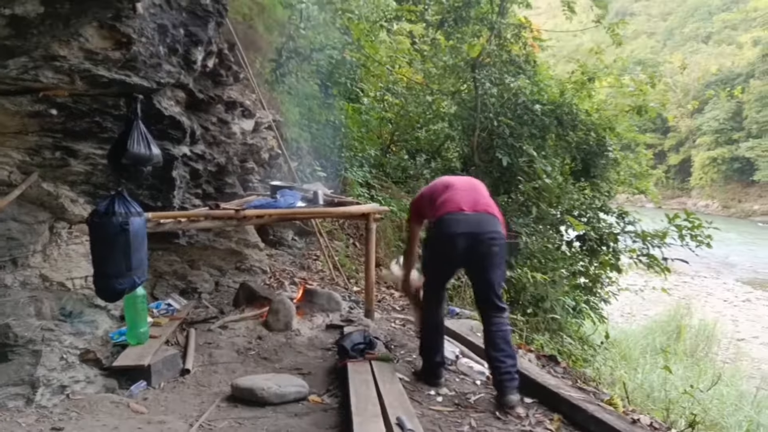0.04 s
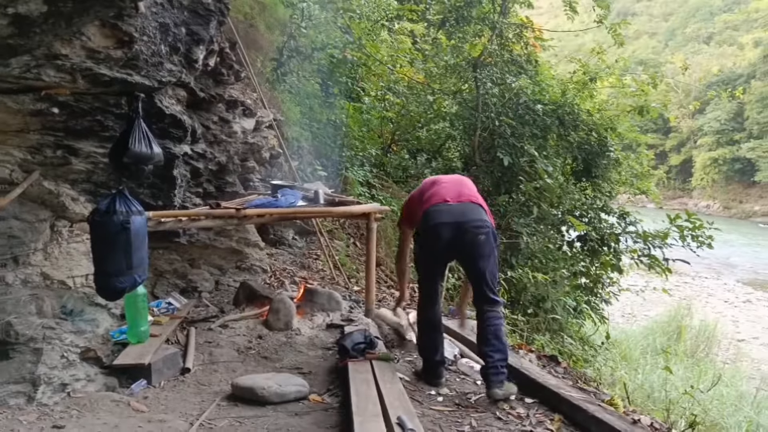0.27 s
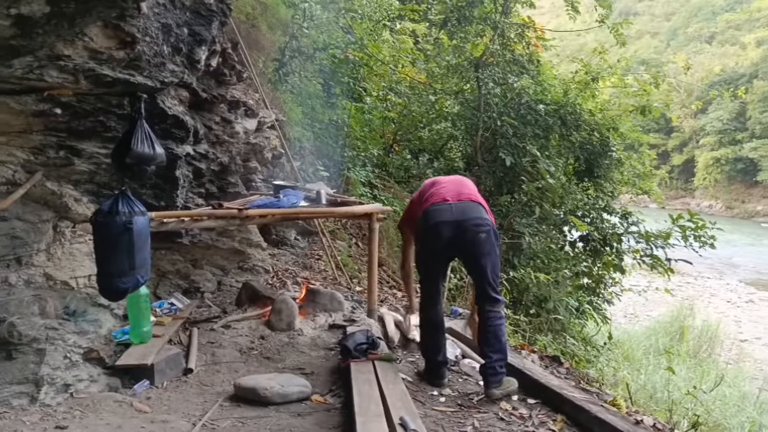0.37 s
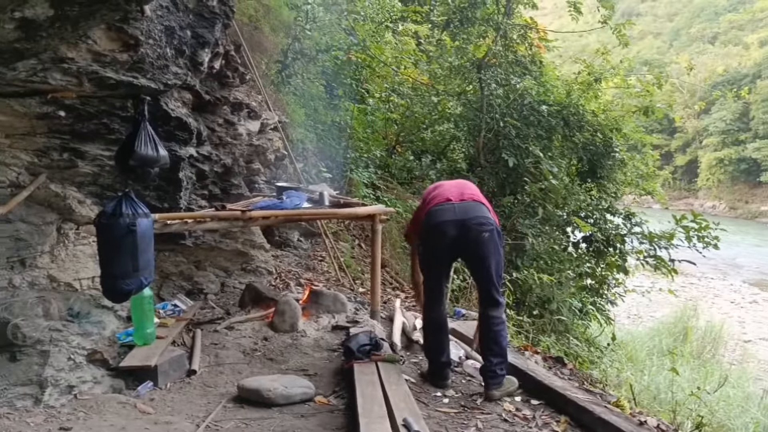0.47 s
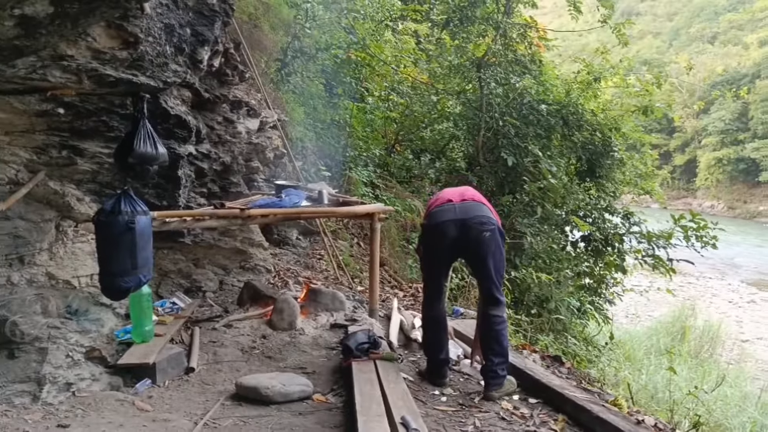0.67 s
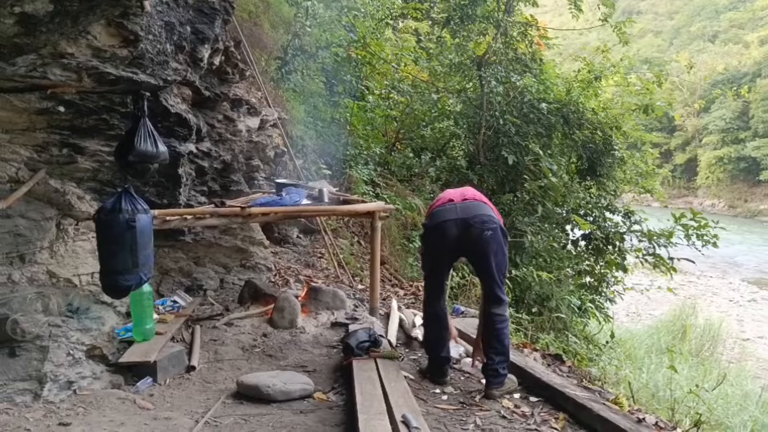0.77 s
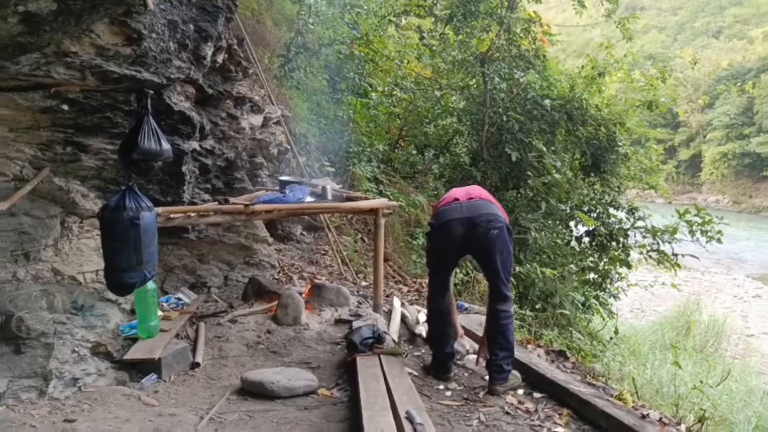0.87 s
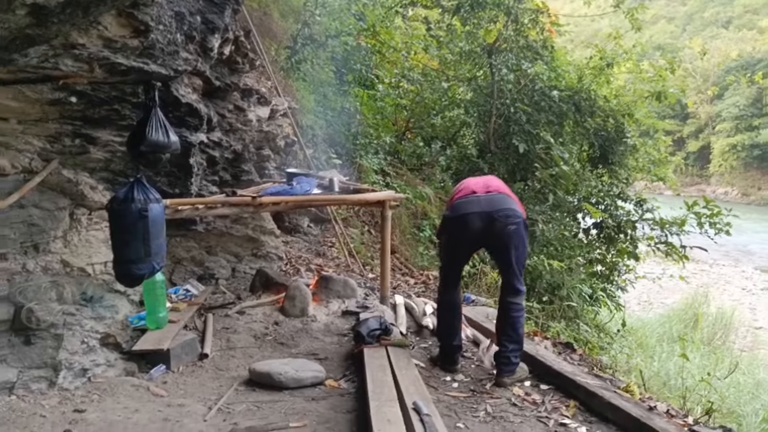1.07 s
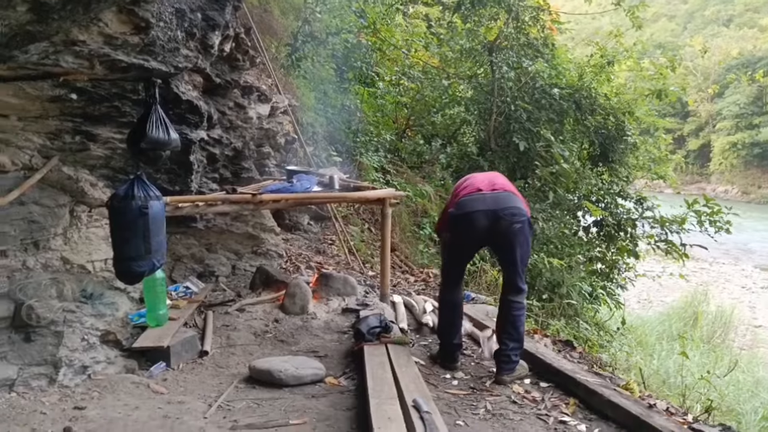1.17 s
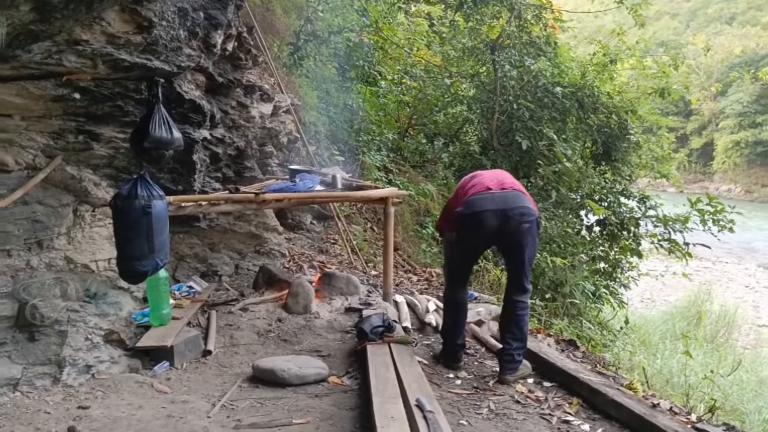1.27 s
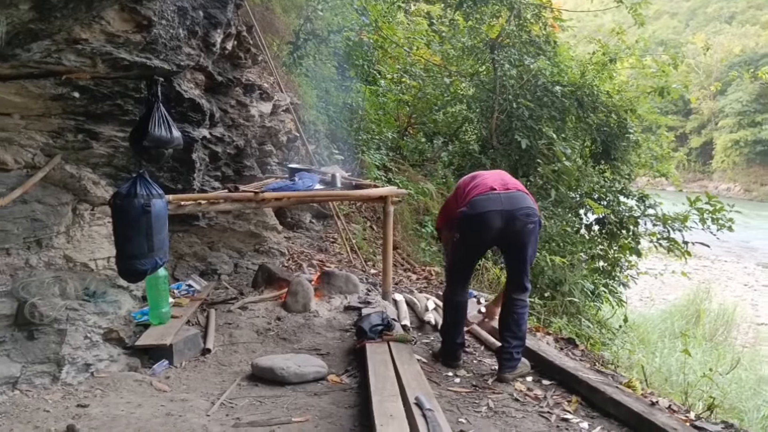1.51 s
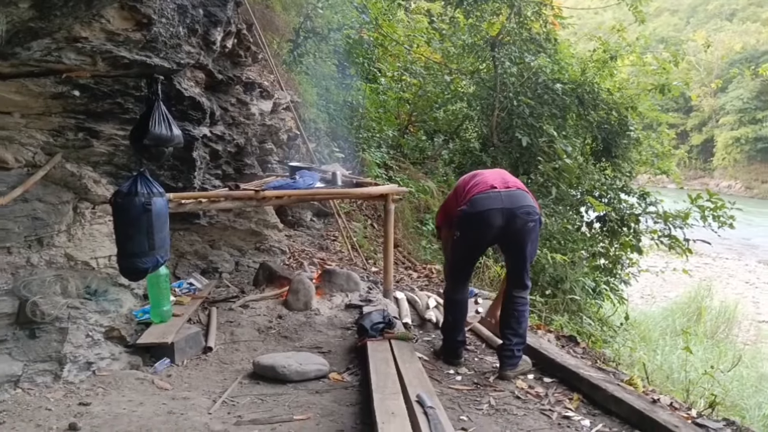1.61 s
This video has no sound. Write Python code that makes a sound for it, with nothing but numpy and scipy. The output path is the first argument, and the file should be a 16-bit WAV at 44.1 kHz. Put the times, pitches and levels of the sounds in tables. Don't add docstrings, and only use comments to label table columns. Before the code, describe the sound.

Split firewood clatters onto a wood pile with hollow knocks, over a steadily rushing river

```python
import sys
import numpy as np
from scipy import signal
from scipy.io import wavfile
from scipy.ndimage import uniform_filter1d

SR = 44100
rng = np.random.default_rng(int(sys.argv[2]) if len(sys.argv) > 2 else 0)


def invert_db(x):
    u = np.asarray(x, float) / 20
    return 10 ** u


def log_audio(samples):
    frames = np.atleast_2d(samples).T
    limited = np.clip(frames, -1, 1)
    pcm = np.round(limited * 32767).astype(np.int16)
    wavfile.write(sys.argv[1], SR, pcm)


N = 72765


def unit(x):
    return x / np.sqrt(np.mean(x ** 2))


def band(x, hz, width):
    return signal.lfilter(*signal.iirpeak(min(hz, 0.42 * SR), hz / min(width, SR / 4), fs=SR), x)


def walk(rate):
    hold = int(SR / rate)
    steps = np.repeat(rng.standard_normal(N // hold + 1), hold)
    return 1.06 * uniform_filter1d(uniform_filter1d(steps, hold), hold)[:N]


# f/Hz, level per Hz/dB
RUSH_SPECTRUM = [(30, -51), (100, -21), (300, -9), (900, -6.5), (2300, -12.5), (3300, -20), (8500, -26.5),
                 (15500, -45)]


def turbulence():
    swell_db, flicker_db = 0.4, 0.6
    out, swell = 0, walk(3.5)
    spectrum_hz, spectrum_db = np.array(RUSH_SPECTRUM).T
    for hz in 30 * 2 ** np.arange(0, 9.1, 1 / 3):
        db = np.interp(np.log(hz), np.log(spectrum_hz), spectrum_db)
        db = db + swell_db * swell + flicker_db * walk(14)
        noise = band(band(rng.standard_normal(N), hz, hz / 3), hz, hz / 3)
        out = out + invert_db(db) * noise
    return unit(out)


def bubbles():
    decay_cycles = 3.3
    out, t = np.zeros(N + SR), np.arange(SR // 16) / SR
    for when, pitch, size in rng.random((240, 3)):
        hz, i = 350 * 2 ** (2.4 * pitch), int(when * N)
        chirp = np.sin(2 * np.pi * hz * t * (1 + 0.0215 * hz * t))
        out[i:i + len(t)] += invert_db(10 * size) * chirp * np.exp(-t * hz / decay_cycles)
    return unit(out[:N])


# f/Hz, width/Hz, level/dB
HOLLOW_MODES = [(136.8, 27, -54), (260, 16.4, -49.5), (500, 97, -52), (695, 30, -60.5)]


def hollow():
    boom = 0
    for hz, width, db in HOLLOW_MODES:
        boom = boom + invert_db(db + 0.49 * walk(5.4)) * unit(band(rng.standard_normal(N), hz, width))
    return boom


# t/s, level/dB
RIVER_LEVEL = [(0, -42), (.15, -44), (.36, -39), (.5, -42), (.9, -41.5), (1.65, -42.5)]


def river():
    bubble_db = -14.5
    t, db = np.array(RIVER_LEVEL).T
    level_db = np.interp(np.arange(N) / SR, t, db)
    water = turbulence() + invert_db(bubble_db) * bubbles()
    return invert_db(level_db) * water + hollow() * invert_db(level_db - level_db.mean())


def overhang(x):
    echo_db, t60_s, centre_hz = -15, 0.12, 1800
    t = np.arange(SR // 3) / SR
    tail = band(rng.standard_normal(len(t)), centre_hz, 2 * centre_hz)
    tail = tail * np.exp(-np.log(1000) * t / t60_s) * (t > 0.004)
    return invert_db(echo_db) * signal.fftconvolve(x, tail / np.sqrt(np.sum(tail ** 2)))[:N]


# t/s, level/dB, centre f/Hz, fade/s
SPLINTERS = [(0.231, -40.5, 8640, .003), (.233, -40, 3600, 0.0024), (.244, -31, 3380, 0.0029),
             (0.25, -40, 5500, 0.0054), (0.27, -55, 7500, .004), (0.274, -28, 3430, 0.0043),
             (0.285, -44.5, 4300, 0.0045), (0.298, -40, 3900, .006), (0.314, -45, 5100, .004),
             (.316, -49, 13500, 0.0039), (.372, -65, 13000, .003), (.396, -53, 4500, .002),
             (.426, -63, 13000, 0.006), (.4895, -36.5, 5300, 0.0012), (1.401, -52, 5900, 0.0018)]


def cracks():
    relative_width, grit_db = 0.75, 3
    out, t = np.zeros(N + SR), np.arange(SR // 12) / SR
    noises = rng.standard_normal((len(SPLINTERS), len(t)))
    for (s, db, hz, fade), noise in zip(SPLINTERS, noises):
        burst = unit(band(band(noise, hz, relative_width * hz), hz, 2 * hz))
        grit = unit(uniform_filter1d(noise[::-1], size=40))
        envelope = 2 * (t / fade) ** 2 * np.exp(-t / fade)
        i = int(s * SR)
        out[i:i + len(t)] += invert_db(db) * burst * invert_db(grit_db * grit) * envelope
    return out[:N]


def fibre_knock(noise, hz, spread):
    grain_db, fade_s, top_hz = -13, 0.016, 2370
    t = np.arange(len(noise)) / SR
    rough = band(band(noise, hz, spread * hz), hz, 2 * hz)
    rough = signal.sosfilt(signal.butter(4, top_hz, fs=SR, output="sos"), rough)
    return invert_db(grain_db) * spread ** 2 * unit(rough) * np.exp(-t / fade_s)


def wood(pitches, modes, blows):
    spot_db = 0.8
    hz = np.array(pitches)[:, None]
    db, t60 = np.array(modes).T[:, :, None]
    out, t = np.zeros(N + SR), np.arange(SR // 3) / SR
    chance = rng.standard_normal((len(blows), 2, len(modes), 1))
    noises = rng.standard_normal((len(blows), len(t)))
    for (s, blow_db, blow_hz, spread, contact), (spot, turn), noise in zip(blows, chance, noises):
        gain = invert_db(db - 5.6 * (np.log2(hz / blow_hz) / spread) ** 2 + spot_db * spot)
        decay = np.exp(-np.log(1000) * t / t60)
        ring = gain * decay * np.sin(2 * np.pi * hz * t + 1.02 * turn)
        rise = np.sin(np.pi / 2 * np.clip(t / max(contact, 2e-4), 0, 1)) ** 2
        knock = ring.sum(axis=0) + fibre_knock(noise, blow_hz, spread)
        i = int(s * SR)
        out[i:i + len(t)] += invert_db(blow_db) * rise * knock
    return out[:N]


LOG_PITCHES = [130, 232, 477, 640, 720, 905, 1046, 1131, 1165, 1519, 1612, 1772, 2165, 2540]
# level/dB, t60/s
LOG_MODES = [(-24, 0.076), (2.5, 0.041), (-2, 0.26), (-1, 0.071), (-3, 0.08), (-8, 0.21), (7.5, 0.039),
             (-0.5, 0.13), (-4, 0.059), (5, 0.043), (0.5, 0.031), (-5, 0.071), (-7, 0.071), (-26, .05)]
# t/s, level/dB, favoured f/Hz, spread/octaves, contact/s
LOG_HITS = [
    (.2715, -9, 1520, 0.13, 0.0083),
    (0.276, -10, 1030, 0.65, 0.0042),
    (.289, -12, 590, 1.27, 0.0092),
    (.303, -18, 1500, 0.66, 0.0017),
    (0.3079, -13.5, 1135, 0.2, 0.0051),
    (.324, -22, 426, 1.44, 0.0021),
    (.342, -30, 610, 0.78, .003),
    (.362, -42, 840, 0.83, 0.0021),
    (.421, -39.5, 475, 0.33, .004),
]


def log():
    return wood(LOG_PITCHES, LOG_MODES, LOG_HITS)


PLANK_PITCHES = [110, 190, 272, 425, 486, 593, 738, 867]
# level/dB, t60/s
PLANK_MODES = [(-33, 0.18), (4, 0.044), (-3, 0.093), (-2.5, 0.08), (0.5, 0.069), (1, 0.12), (-3.5, 0.077),
               (-6.5, 0.124)]
# t/s, level/dB, favoured f/Hz, spread/octaves, contact/s
PLANK_HITS = [(.1692, -20, 540, 0.58, 0.0023), (.1705, -20.5, 296, 0.44, 0.0047),
              (.183, -41, 580, 0.35, 0.0025), (.2335, -20, 500, 0.52, 0.0045),
              (0.236, -20, 185, .6, 0.0032), (0.263, -27, 210, 0.77, .004), (0.283, -36, 260, 0.77, 0.0017),
              (.323, -23.5, 211, 1, 0.0023), (.398, -37, 510, 1, 0.00067),
              (.408, -32.5, 450, 1.34, 0.00083), (.428, -31, 170, 0.38, 0.0024),
              (.548, -34, 270, 0.41, 0.0014), (.5975, -29.5, 714, 0.25, 0.0014),
              (.600, -43, 480, 0.17, .002), (.620, -35.5, 736, 0.29, 0.0025),
              (0.642, -31, 390, 0.51, 0.0026), (.811, -42, 745, 0.37, 0.0016),
              (.828, -38.5, 500, 1.9, 0.00066), (.841, -47, 480, 1.3, 0.0034)]


def plank():
    return wood(PLANK_PITCHES, PLANK_MODES, PLANK_HITS)


BILLET_PITCHES = [545, 834, 953, 979, 1080, 1616, 1640, 1695, 1836, 1900, 2100, 2130, 2276, 2520]
# level/dB, t60/s
BILLET_MODES = [(-27, .08), (-12, 0.097), (-13, .08), (1.5, 0.14), (5.5, 0.037), (1.5, 0.06), (-1.5, 0.076),
                (-7, 0.13), (-9, 0.092), (-7, 0.072), (-4.5, 0.1), (-3.5, .06), (-6, 0.057), (-49, 0.027)]
# t/s, level/dB, favoured f/Hz, spread/octaves, contact/s
BILLET_HITS = [(.230, -20, 2100, 1.16, 0.0038), (0.2329, -17.5, 1140, 0.82, 0.0034),
               (0.242, -11.5, 1180, 1.96, 0.0044), (0.251, -20, 1880, 1.44, 0.0018),
               (.263, -21.5, 1800, 0.36, 0.0025), (.285, -17, 1900, 1.8, 0.0015),
               (0.296, -26, 1850, 0.2, 0.0016), (0.4184, -29, 1635, 0.21, 0.0029),
               (0.422, -30, 950, 0.25, 0.0027), (.439, -30.5, 955, 0.38, 0.0017),
               (0.45, -33, 1610, 0.25, 0.00082), (.454, -36, 975, 0.36, 0.0018),
               (.469, -42, 970, 0.24, 0.0052), (0.5125, -30, 964, .12, 0.0047),
               (.520, -38.5, 2120, 0.26, 0.0027)]


def billet():
    return wood(BILLET_PITCHES, BILLET_MODES, BILLET_HITS)


def scene():
    water = river()
    knocks = cracks() + log() + plank() + billet()
    return (water + knocks + overhang(knocks))[None]


def band_limit(x):
    return signal.sosfilt(signal.butter(12, 15680, fs=SR, output="sos"), x)


def record(dry):
    dip_hz, dip_width_hz, dip = 12200, 7500, 0.61
    lift_hz, lift_width_hz, lift = 13500, 1800, 0.28
    bass_hz, top_hz, limit = 75, 15550, 0.95
    x = dry - dip * band(dry, dip_hz, dip_width_hz) + lift * band(dry, lift_hz, lift_width_hz)
    x = signal.sosfilt(signal.butter(3, bass_hz, "high", fs=SR, output="sos"), x)
    x = signal.sosfilt(signal.ellip(10, 0.2, 60, top_hz, fs=SR, output="sos"), x)
    x = limit * np.tanh(x / limit)
    return band_limit(x)


dry = scene()
out = record(dry)
log_audio(out)
```